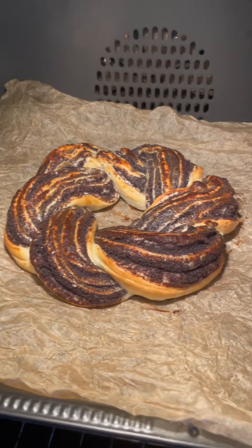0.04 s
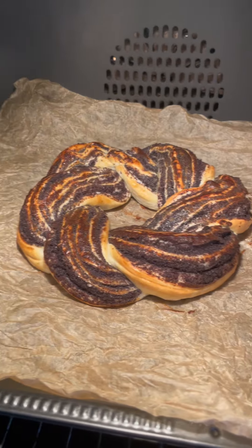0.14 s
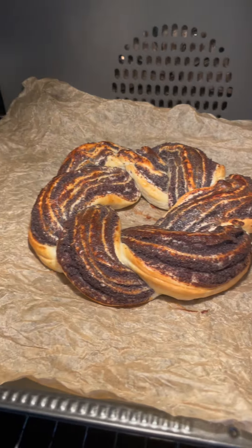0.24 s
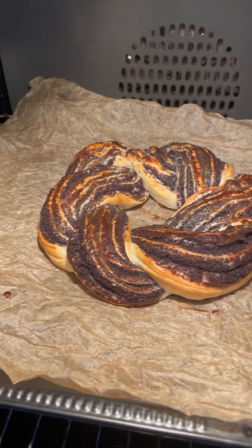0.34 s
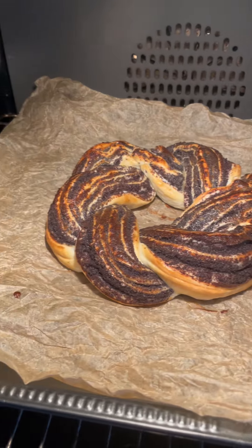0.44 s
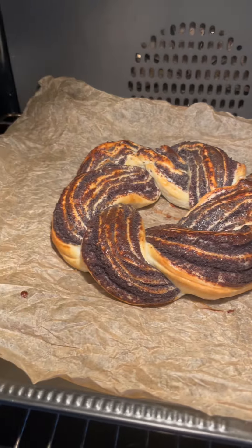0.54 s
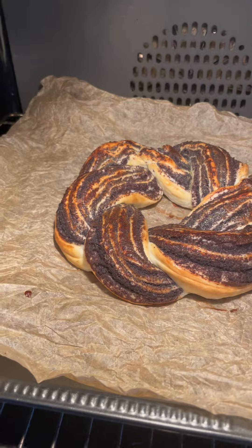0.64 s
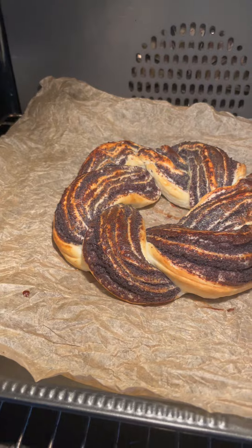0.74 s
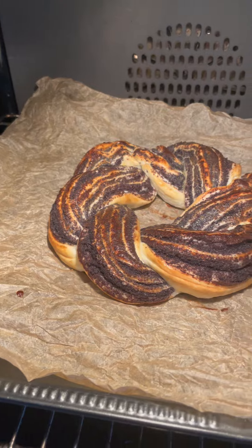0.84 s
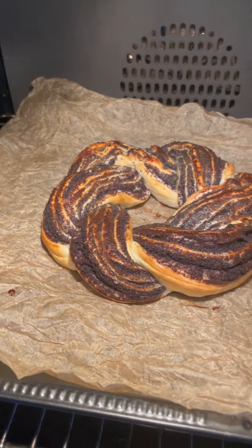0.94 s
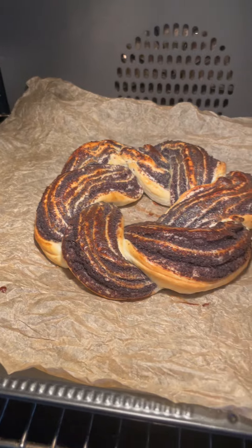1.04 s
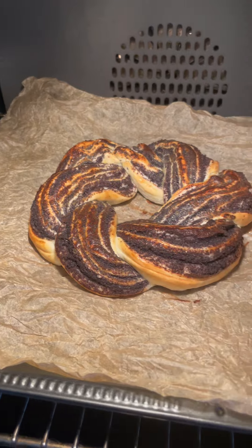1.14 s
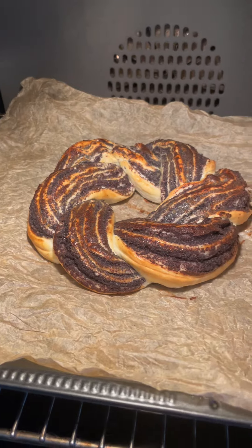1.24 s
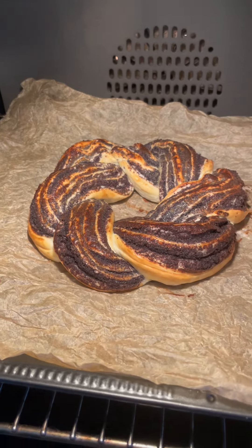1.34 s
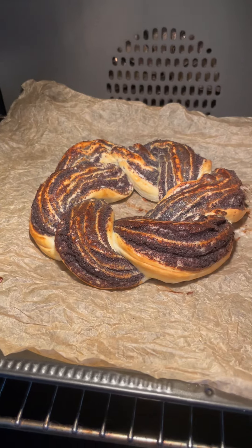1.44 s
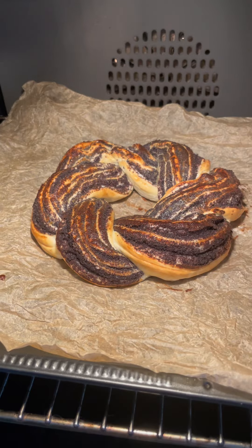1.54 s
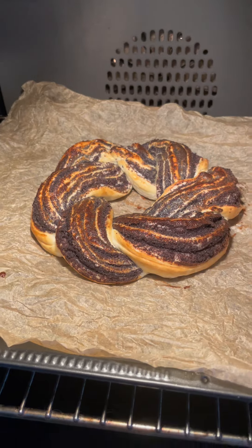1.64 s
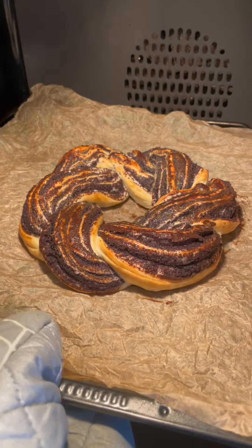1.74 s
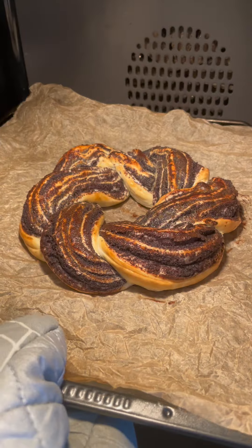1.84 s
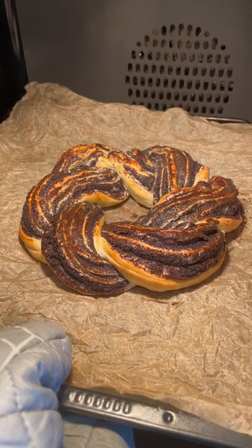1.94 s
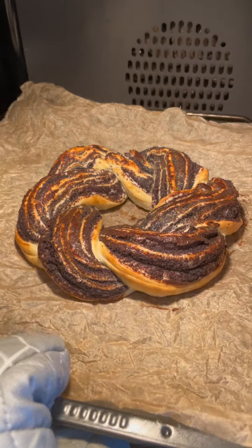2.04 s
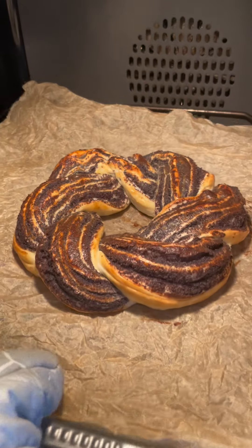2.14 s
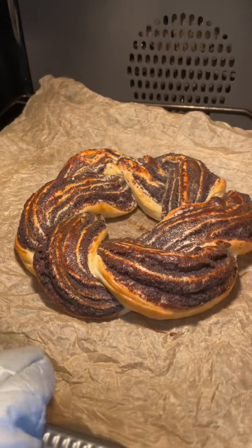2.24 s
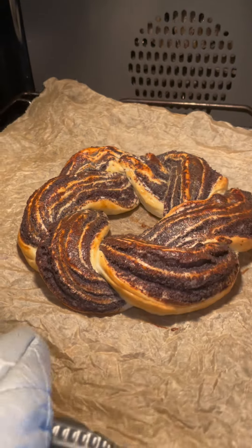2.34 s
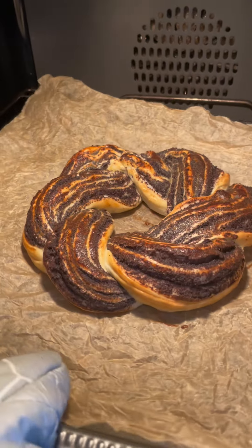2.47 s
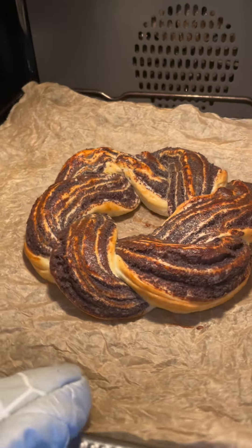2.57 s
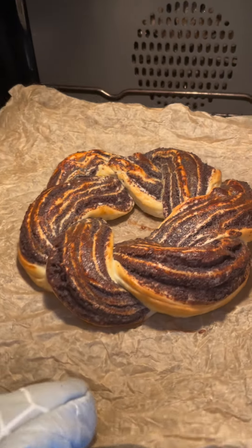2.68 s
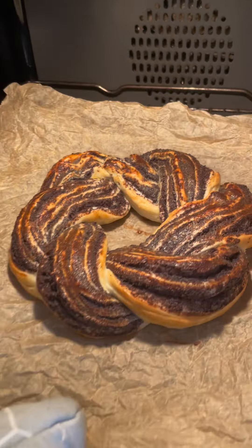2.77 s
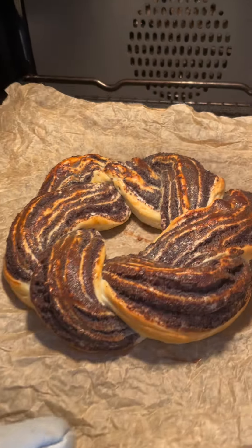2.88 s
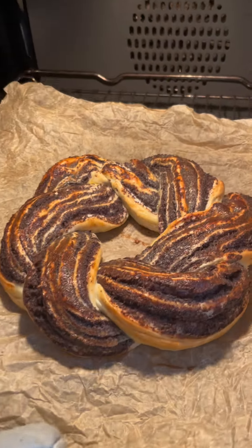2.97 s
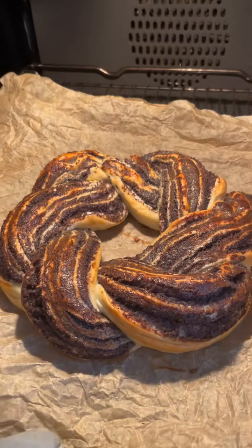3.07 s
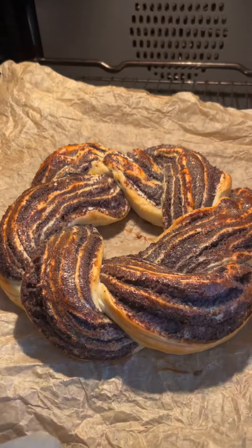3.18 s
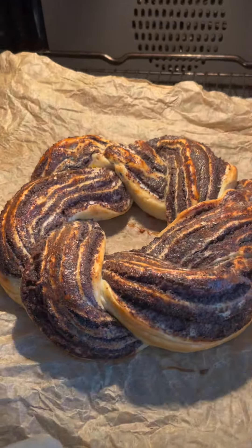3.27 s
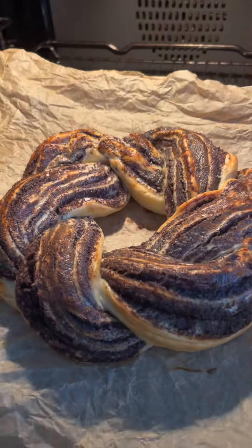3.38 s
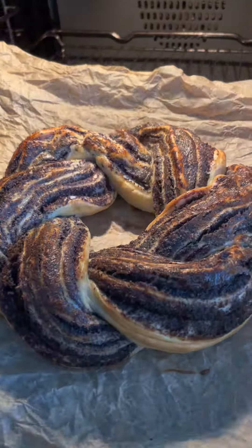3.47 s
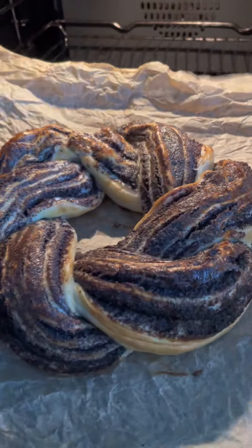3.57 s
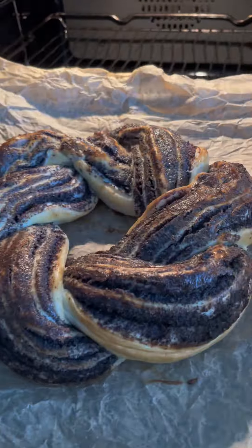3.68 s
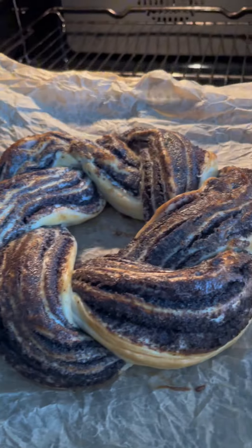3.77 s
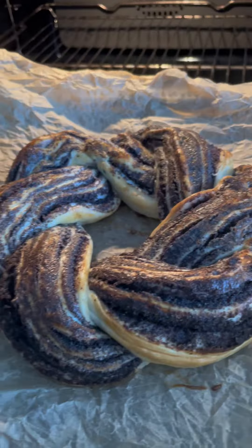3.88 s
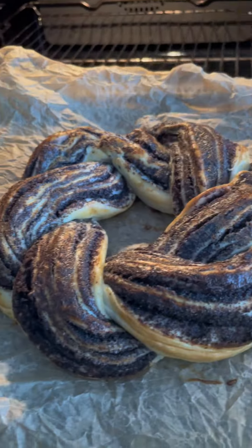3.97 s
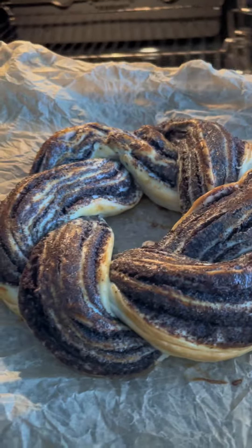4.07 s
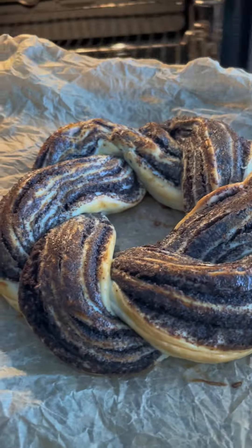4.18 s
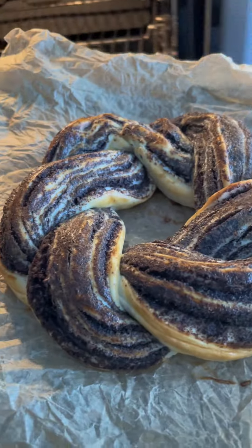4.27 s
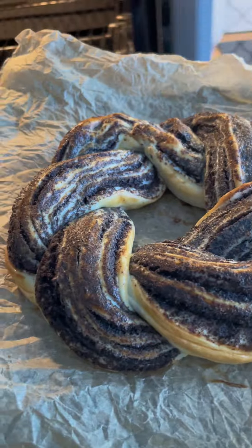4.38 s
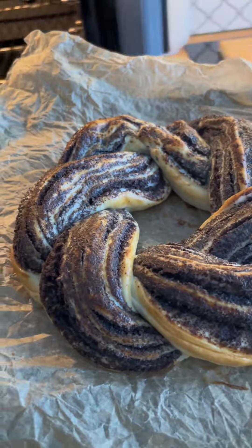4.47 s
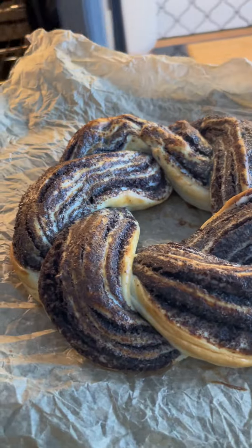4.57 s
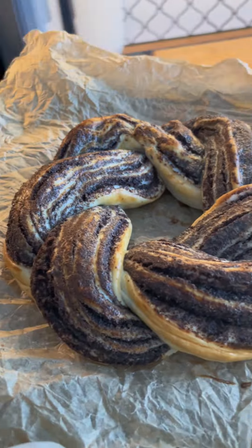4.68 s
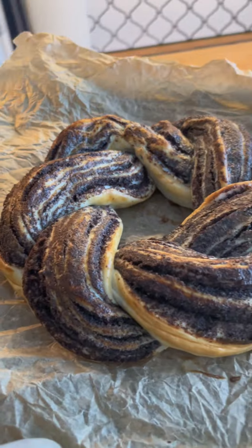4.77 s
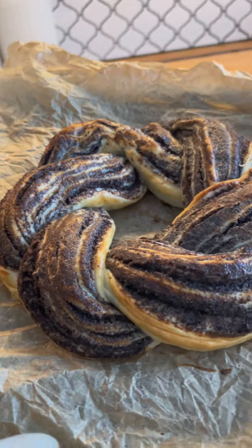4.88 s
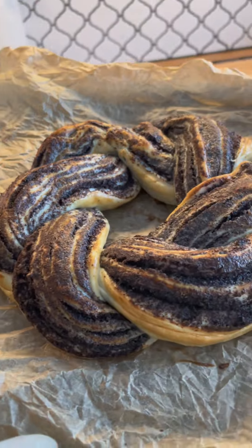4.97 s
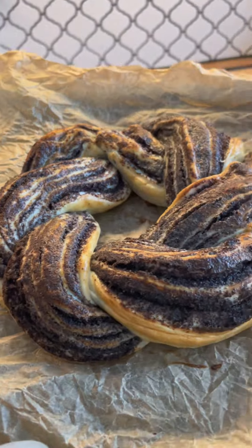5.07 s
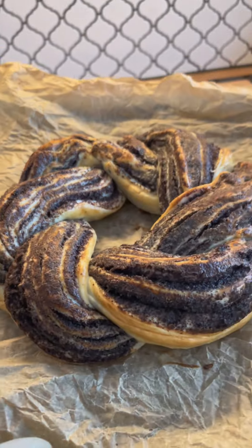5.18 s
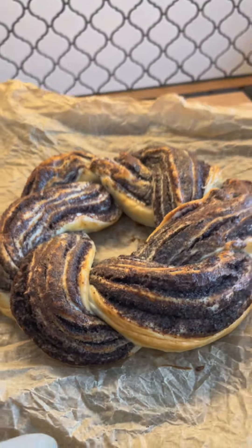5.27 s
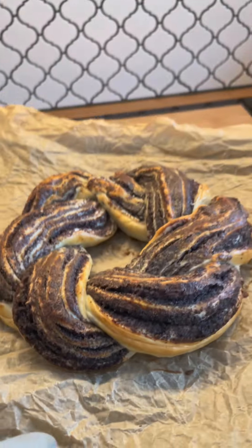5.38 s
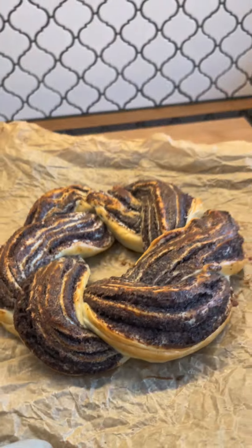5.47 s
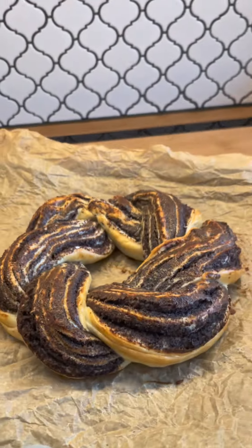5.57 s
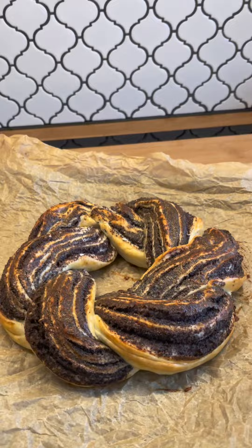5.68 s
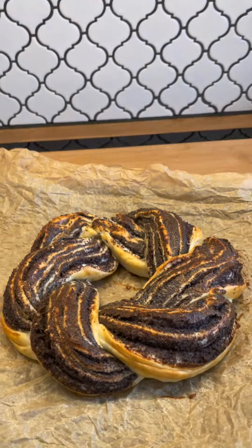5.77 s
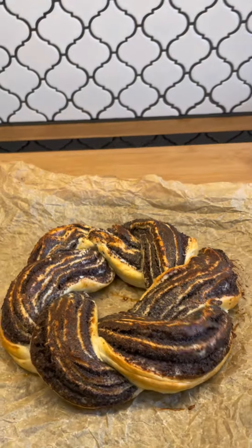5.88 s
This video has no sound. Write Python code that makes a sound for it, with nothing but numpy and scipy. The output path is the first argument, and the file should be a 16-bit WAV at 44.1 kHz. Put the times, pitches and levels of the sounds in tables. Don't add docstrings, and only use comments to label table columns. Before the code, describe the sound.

Close phone capture in a kitchen: soft oven fan alone at first, with tiny ticks. Abruptly a baking tray rattles and scrapes in uneven jerks across rack wires, loud metallic clacks over deep wobbling sheet booms and crackly paper. The fan recedes as the tray is carried, with a bright clink and small taps, then the corner lands with a short bouncing knock on a wooden top.

```python
import sys
import numpy as np
from scipy import signal
from scipy.fft import rfft, irfft, next_fast_len
from scipy.io import wavfile
from scipy.ndimage import uniform_filter1d, map_coordinates

SR = 44100
rng = np.random.default_rng(int(sys.argv[2]) if len(sys.argv) > 2 else 0)


def how_loud(loudness_db):
    steps = np.asarray(loudness_db, float) / 20
    return 10 ** steps


def digitize_waveform(pressure):
    field = np.atleast_2d(pressure).T
    bounded = np.clip(field, -1, 1)
    quanta = np.round(bounded * 32767).astype(np.int16)
    wavfile.write(sys.argv[1], SR, quanta)


N = 261072


def unit(x):
    return x / np.sqrt(np.mean(x ** 2) + 1e-20)


def along(points, hz):
    f, v = np.transpose(points)
    return np.interp(np.log(hz + 1), np.log(f + 1), v)


def curves(rows):
    times, *columns = np.transpose(rows)
    return [np.interp(np.arange(N) / SR, times, column) for column in columns]


def wobble(rate):
    coarse = np.arange(0, N + 32, 32)
    knots = rng.standard_normal(int(N * rate / SR) + 4)
    return np.interp(np.arange(N), coarse, map_coordinates(knots, [coarse * rate / SR]))


def filtered(x, response):
    m = next_fast_len(x.shape[-1] + 2048)
    spectrum = rfft(x, m) * response(np.fft.rfftfreq(m, 1 / SR))
    return irfft(spectrum, m)[..., :x.shape[-1]]


def resonances(f, modes):
    total = 0
    for k, (centre, width, db) in enumerate(modes):
        damping = 1j * f * width
        total = total + (-1) ** k * how_loud(db) * damping / (centre * centre - f * f + damping)
    return total


def add_at(out, s, sound):
    out[round(s * SR):][:len(sound)] += sound


def grit(per_s, spread_db, smooth):
    size = how_loud(spread_db * np.minimum(rng.exponential(size=N), 2.5))
    slips = (rng.random(N) < per_s / SR) * rng.standard_normal(N) * size
    return unit(slips) + smooth * rng.standard_normal(N)


def patchy(x, depth_db):
    z = signal.stft(x, nperseg=256)[2]
    field = uniform_filter1d(rng.standard_normal(z.shape), size=5, axis=0)
    field = uniform_filter1d(field, size=9, axis=1)
    return unit(signal.istft(z * how_loud(depth_db * unit(field)), nperseg=256)[1][:N])


# (start [s], length [s], load [dB], speed [dB], trend over the pull [dB])
STROKES = [(1.73, 0.19, -58, -63, 9), (1.933, 0.1, -47.5, -52.5, 1.5), (2.05, 0.17, -37.5, -54.5, 2.5),
           (2.213, 0.088, -43, -36.5, -1.5), (2.303, 0.28, -46.5, -44, -1), (2.6, 0.51, -47, -54, -5.5),
           (2.85, .2, -35, -50.5, -1.5), (3.056, 0.12, -35.5, -42.5, -2.5), (3.212, 0.13, -45.5, -50.5, 4),
           (3.361, 0.069, -43.5, -36.5, -3), (3.413, 0.07, -26.5, -31.5, -7.5),
           (3.487, 0.12, -38.5, -34.5, -5), (3.621, 0.24, -51.5, -52.5, -13),
           (3.826, 0.092, -54, -49.5, -5.5), (3.933, 0.28, -57.5, -67.5, -13), (4.515, .28, -63, -73, 3),
           (4.89, 0.17, -61, -59.5, -17), (5.043, 0.066, -56, -68, -12), (5.256, 0.24, -56, -64, -7.5),
           (5.417, 0.14, -63.5, -56.5, 2.5), (5.558, 0.084, -73, -51, -5), (5.68, 0.22, -66, -64.5, -5)]
GRIP_S, LET_GO_S = 0.0079, 0.15


def strokes():
    load, speed, t = np.zeros(N), np.zeros(N), np.arange(N) / SR
    for s, length, load_db, speed_db, trend_db in STROKES:
        start = int(s * SR)
        u = t[start:] - s
        drift_db = trend_db * np.minimum(u / length, 1)
        fade_db = 60 * np.maximum(u - length, 0) / LET_GO_S
        shape = (1 - np.exp(-u / GRIP_S)) * how_loud(drift_db - fade_db)
        load[start:] += (how_loud(load_db) * shape) ** 2
        speed[start:] += (how_loud(speed_db) * shape) ** 2
    return np.sqrt(load), np.sqrt(speed)


# (start [s], length [s], level [dB])
RUBS = [(0.34, .03, -70), (0.586, .02, -68), (0.668, .03, -70), (2.72, .03, -50), (2.81, .04, -48),
        (3.70, .03, -55), (3.755, .06, -58), (3.866, .025, -53), (5.69, .02, -62), (5.715, .05, -59),
        (5.775, .07, -67)]
RUB_FADE_S = 0.05


def rubs():
    t, gain = np.arange(N) / SR, np.zeros(N)
    for s, length, db in RUBS:
        fade_db = np.minimum(60 * np.maximum(t - s - length, 0) / RUB_FADE_S, 99)
        gain += (t > s) * how_loud(db - fade_db)
    return gain


# (time [s], level [dB], pitch [Hz], t60 [s])
FLEXES = [(1.74, -70, 84.9, 0.53), (1.982, -37, 87.3, 1.2), (2.103, -28.5, 150, 1),
          (2.189, -24.5, 164.2, 0.54), (2.227, -23, 117.8, 0.19), (2.31, -35.5, 131.7, 1.8),
          (2.45, -35.5, 89.4, 1.2), (2.56, -38, 84.7, 0.51), (2.621, -36, 83.7, 0.83),
          (2.671, -32, 76, 0.32), (2.872, -33, 161.3, 1.4), (2.931, -32.5, 108.3, 1.3),
          (3.02, -36.5, 142.9, 1.2), (3.105, -33, 111, 1), (3.331, -35.5, 98.5, 0.19),
          (3.441, -35.5, 58, 0.24), (3.58, -36, 57.9, 0.56), (3.72, -56, 99.8, 0.49),
          (4.699, -47, 111.3, 0.46), (5.07, -57.5, 110.2, .4), (5.268, -56, 110, 0.42),
          (5.43, -60, 110, 0.29), (5.86, -60, 109, 0.42)]
SWELL_DB_PER_S, LONGEST_T60_S = 214, 1.2


def flexes():
    t = np.arange(0, N + 64, 64) / SR
    levels = []
    for s, db, _, t60 in FLEXES:
        fade_db = 60 * (t - s) / min(t60, LONGEST_T60_S)
        levels.append(db - np.where(t < s, SWELL_DB_PER_S * (s - t), fade_db))
    loudest = np.max(levels, axis=0)
    return how_loud(np.interp(np.arange(N) / SR, t, loudest)), curves(FLEXES)[1]


# (frequency [Hz], width [Hz], level [dB])
SHEET = [(890, 35, 1.5), (1278, 76, 5), (1470, 25, 5), (1698, 20, 10.5), (1952, 80, 3), (2202, 78, 9.5),
         (2450, 62, 3.5), (2800, 83, 10), (3200, 36, 4), (3570, 93, 10.5), (4085, 48, 3), (5600, 51, 6.5),
         (5857, 55, 1), (7030, 70, 2.5)]
# (frequency [Hz], width [Hz], level [dB])
RACK = [(293, 47, -5), (413, 24, 10), (476, 18, 4), (573, 40, 5), (890, 6.5, -1.5)]
# (frequency [Hz], width [Hz], level [dB])
BOOM = [(79, 96, -3), (150, 132, -0.15)]
# (frequency [Hz], level per Hz [dB])
RATTLE = [(120, -5.5), (280, 2.5), (600, -0.5), (1200, -0.5), (2200, -64.5)]
# (frequency [Hz], level per Hz [dB])
SLIP = [(600, -35), (1300, 0), (2200, 2.5), (3600, -1), (5500, -32.5), (12000, -2)]
# (frequency [Hz], level per Hz [dB])
RASP = [(2200, -12), (4200, -7), (8000, -5.5), (11000, 7), (14000, -12.5), (16000, -19.5)]
EDGE_LOAD_DB, EDGE_SPEED_DB = -4.5, 5
WOOD_S, WOOD_DB = 5.9, 14
CATCH_DB = 1.2


def drag():
    load, speed = strokes()
    on_wood = np.arange(N) > WOOD_S * SR
    edge = np.hypot(how_loud(EDGE_LOAD_DB) * load, how_loud(EDGE_SPEED_DB) * speed) * how_loud(WOOD_DB * on_wood)
    edge = edge + rubs()
    bend, flex_hz = flexes()
    judder = wobble(45)

    def body(shape):
        return lambda f: how_loud(along(shape, f)) * (0.5 + resonances(f, SHEET) * how_loud(-5.5))

    def wires(f):
        return how_loud(along(RATTLE, f)) * (0.59 + resonances(f, RACK))

    phase = 2 * np.pi * np.cumsum(flex_hz * (1 + 0.0736 * wobble(30))) / SR
    flex = np.sin(phase) * how_loud(0.84 * wobble(25))
    shake = unit(filtered(rng.standard_normal(N), lambda f: resonances(f, BOOM) ** 2))
    boom = bend * (0.7 * flex + 0.62 * shake)

    rattle = patchy(filtered(grit(900, 2.4, smooth=1.8), wires), depth_db=1.5)
    rattle = rattle * load * how_loud(0.53 * judder)

    flutter_db = 1.0 * judder + 1.5 * wobble(120)
    slip = patchy(filtered(grit(900, 2.8, smooth=0.9), body(SLIP)), depth_db=1.4)
    slip = slip * edge * how_loud(flutter_db)

    rasp_db = 10.5 + CATCH_DB * judder + 1.7 * wobble(76)
    rasp = patchy(filtered(grit(1500, 1.4, smooth=1.0), body(RASP)), depth_db=1.5)
    rasp = rasp * speed * how_loud(rasp_db)
    return boom + rattle + slip + rasp


# (frequency [Hz], width [Hz], level [dB]); a clack uses only the frequencies
TRAY = [(389.5, 7.4, -1.5), (1247, 51, -6.5), (1960, 320, -15), (2890, 63, 7.5), (3800, 49, -18),
        (3970, 41, 2.5), (5500, 160, -31), (6760, 490, -16), (7870, 50, -32.5)]
FIRST_TOUCH, TOUCH_S = 1.75, 0.00034


def clack(hz, thud_db, snap_db, linger_db):
    t = np.arange(SR // 10) / SR
    slow = how_loud(min(linger_db, 5))

    def fade(t60):
        return how_loud(-60 * t / (t60 * slow)) * (1 - np.exp(-t / (0.00065 * slow)))

    def burst(t60):
        touches = rng.standard_normal(len(t)) * how_loud(2.78 * rng.standard_normal(len(t)))
        first = FIRST_TOUCH / max(slow, 1) ** 2 * np.exp(-t / TOUCH_S)
        return touches * (fade(t60) + 0.15 * fade(3.14 * t60) + first)

    def top(v):
        return v / np.abs(v).max()

    modes = [(hz, 0.11 * hz, 1.5), (hz, 0.92 * hz, -8)]
    for centre, _, _ in TRAY:
        modes.append((centre, 70 + 0.02 * centre, -5 - 14 * abs(np.log(centre / hz))))

    def dull(f):
        return resonances(f, [(932, 1950, 0.0091)]) ** 2 + resonances(f, [(241, 170, 0.5)])

    ring = filtered(burst(0.041), lambda f: resonances(f, modes))
    thud = filtered(burst(0.12), dull)
    snap = filtered(burst(0.031), lambda f: resonances(f, [(11720, 9150, 0)]) ** 2)
    return top(ring) + how_loud(thud_db + 5.0) * top(thud) + how_loud(snap_db + 10.0) * top(snap)


# (time [s], peak [dB], centre [Hz], snap [dB])
CLICKS = [(1.7513, -41, 2370, -7), (1.7747, -10, 6300, -12), (1.8085, -13.5, 5500, -20),
          (1.8165, -13.5, 3740, -8), (1.8855, -19, 3440, 6), (1.9335, -29, 3700, -18.5),
          (2.2304, -30.5, 4100, 15), (2.2905, -21, 3900, 4), (2.3548, -8.5, 3800, -3.5),
          (2.3956, -21, 2770, 6), (2.4425, -10.5, 2920, -6.5), (2.6721, -29, 2400, -32),
          (3.2321, -24, 3280, -2), (3.2775, -5, 4270, -4), (3.2779, -18.5, 4650, 14),
          (3.3546, -17, 6270, -1), (3.3864, -15, 7600, -1.5), (3.5967, -15, 6400, -4),
          (3.695, -38, 3800, -15.5), (3.7078, -28, 5000, -12), (5.5257, -21, 5690, -10.5),
          (1.7755, -30, 2640, -25), (5.5801, -21, 6400, 11), (5.615, -32, 5170, 6),
          (1.9851, -29, 2100, -10), (2.0754, -38.5, 2800, 10), (2.0834, -28, 1990, -18),
          (2.2101, -22, 2080, -8), (2.4755, -23, 1960, -2), (2.497, -45, 2800, -2), (2.5808, -33, 5500, 7),
          (2.6237, -37, 5500, 8), (2.6521, -32, 2140, -16), (2.7968, -51, 5500, 12),
          (2.8143, -26.5, 1410, -24), (2.8861, -35, 1345, 3), (2.9405, -36, 2700, 9),
          (2.9789, -34, 2750, 9), (3.0682, -25, 1680, -12), (3.1111, -40, 5810, 5), (3.2138, -35, 6120, 6),
          (3.3296, -31, 2450, 4), (3.361, -18, 7040, -1.5), (3.3725, -27, 2150, 11.5),
          (3.4932, -27, 2190, 7.5), (3.5107, -14.5, 7030, -3.5), (3.5496, -28, 2370, 3),
          (5.5262, -27, 3850, -17), (5.5812, -24, 2880, -9)]
# (time [s], peak [dB], centre [Hz], snap [dB])
RAPS = [(1.7278, -42.5, 2670, -8), (1.8113, -18.5, 4070, 4), (1.882, -19, 4640, 9.5),
        (2.0282, -26.5, 2500, -30), (2.2054, -17, 2090, -20), (2.3333, -18, 2970, 5),
        (2.6837, -21, 2565, -10), (3.1104, -29.5, 1900, 8), (3.1556, -18.5, 5900, 3),
        (3.419, -17.5, 2220, 6.5), (3.4479, -22.5, 3700, 9), (3.5552, -10, 2256, -2),
        (3.6319, -25.5, 4950, 3), (3.834, -34.5, 7330, -14), (3.8654, -33, 2330, 1),
        (3.876, -33.5, 3000, 5), (3.9054, -49.5, 2250, 17), (4.6408, -47, 2115, -21),
        (5.4443, -37.5, 1597, 5), (5.4695, -33, 1980, -2)]
# (time [s], peak [dB], centre [Hz], snap [dB])
BUMPS = [(2.0601, -25, 1960, -22), (2.1164, -21, 2460, -18), (2.1214, -31, 2830, -9),
         (2.1788, -27, 2700, -25), (2.5554, -37.5, 2365, 10.5), (2.7975, -36.5, 2410, 3),
         (2.8321, -28.5, 1960, 6.5), (2.8583, -23.5, 2290, -33.5), (3.0294, -34.5, 2400, -11),
         (5.2658, -39, 1540, -27), (5.5454, -40.5, 1470, -6), (5.8800, -31, 1580, -28.5)]
# (time [s], peak [dB], centre [Hz], thud [dB])
PINGS = [(3.7519, -19, 8560, -26), (4.903, -17, 5400, -39), (4.9036, -27.5, 1360, -29.5),
         (5.5803, -26, 7470, -10), (5.8765, -26, 1800, -3), (2.1950, -14, 1960, -8.5),
         (2.8589, -28, 1290, 2.5), (4.8890, -60, 5070, -30), (4.8948, -41.5, 5100, -12),
         (5.8610, -44, 1260, -16)]
# (time [s], peak [dB])
TICKS = [(0.119, -46), (0.35, -53), (0.508, -48), (0.592, -54), (0.619, -50), (0.821, -55), (1.03, -50),
         (1.232, -50.5), (1.615, -55), (4.2623, -52.5), (4.374, -52), (4.433, -57), (4.4645, -52),
         (4.476, -60), (4.493, -58), (4.599, -52), (5.049, -56.5), (5.199, -53.5)]
# (frequency [Hz], level [dB], t60 [s])
CLINK = (4.9028, [(5080, -43, .13), (5230, -37, .05), (5350, -39, .12), (5480, -40, .05)])
CLICK, RAP, BUMP = (-29, -1.36), (-12, 0.83), (0.45, 5.5)
PING_SNAP_DB, PING_LINGER_DB = 2.2, -9
SNAP_DB_PER_OCTAVE = 21


def contacts():
    out = np.zeros(N + SR)
    for rows, (thud_db, linger_db) in [(CLICKS, CLICK), (RAPS, RAP), (BUMPS, BUMP)]:
        for s, db, hz, snap_db in rows:
            add_at(out, s, how_loud(db - 3.5) * clack(hz, thud_db, snap_db, linger_db))
    for s, db, hz, thud_db in PINGS:
        snap_db = PING_SNAP_DB + SNAP_DB_PER_OCTAVE * np.log2(hz / 6000)
        add_at(out, s, how_loud(db) * clack(hz, thud_db, snap_db, PING_LINGER_DB))
    for s, db in TICKS:
        add_at(out, s, how_loud(db - 2.5) * clack(7400, -9, 3, -14))
    t = np.arange(SR // 10) / SR
    clink_s, clink_modes = CLINK
    for hz, db, t60 in clink_modes:
        add_at(out, clink_s, how_loud(db - 60 * t / t60) * np.sin(2 * np.pi * hz * t))
    return out[:N]


# (time [s], level [dB])
LANDING = [
    (5.8845, -5),
    (5.8874, -10),
    (5.8906, -8.5),
]
# (frequency [Hz], level [dB], t60 [s])
CORNER = [(305, -12.5, 0.027), (385, -13, 0.045), (577, -11.5, 0.037), (763, -17, .05), (1000, -3.5, 0.034),
          (1150, -4, 0.035), (1302, -0.5, 0.045), (1580, -1, 0.026), (2218, -10.5, 0.06),
          (2330, -9.5, 0.048), (2660, -11, 0.037), (3600, -21.5, 0.032), (5685, -11, 0.033),
          (6900, -22, .03)]
WOOD_DAMPS = 0.75


def landing():
    out, t = np.zeros(N + SR), np.arange(SR // 10) / SR
    for s, db in LANDING:
        ring = np.zeros(len(t))
        for hz, level_db, t60 in CORNER:
            decay_db = level_db + rng.normal(0, 1.66) - 60 * t / (WOOD_DAMPS * t60)
            ring += how_loud(decay_db) * np.sin(2 * np.pi * hz * t)
        ring = ring * (1 - np.exp(-t / 0.00078))
        add_at(out, s, how_loud(db) * (ring + how_loud(-8.5) * clack(2400, -4.5, -5.0, 0.53)))
    return out[:N]


# (time [s], level [dB], frequency [Hz], t60 [s])
RINGS = [(1.7745, -30, 3430, .03), (1.8112, -21, 6029, .03), (1.8112, -20, 3600, .035),
         (1.8168, -19, 3590, .035), (1.8825, -25, 6287, .03), (1.883, -31, 1960, 0.035),
         (1.885, -30, 7300, .03), (2.124, -32, 2770, .04), (2.229, -29, 4200, .04), (2.231, -34, 6115, .04),
         (2.355, -27, 2060, 0.041), (2.396, -35, 6976, .03), (2.442, -32, 5943, .03),
         (2.671, -41, 2490, 0.073), (2.729, -35, 1346, 0.092), (2.859, -25, 1981, .04),
         (2.938, -30, 429, 0.11), (3.157, -34, 7200, .04), (3.2775, -23, 7100, .03),
         (3.278, -28, 6373, .03), (3.282, -30, 1714, .035), (3.385, -33, 6330, .03),
         (3.4185, -22, 2170, .04), (3.419, -27, 3380, .04), (3.449, -28, 3703, .04),
         (3.508, -32, 2153, .05), (3.509, -32, 3875, .05), (3.518, -31, 5857, .04), (3.555, -33, 5700, .04),
         (3.5565, -23, 2245, 0.049), (3.565, -29.5, 3875, 0.046), (3.6955, -40, 3750, 0.023),
         (3.7078, -36, 3780, .03), (3.751, -28, 6680, .02), (3.7515, -29, 3800, .02),
         (3.752, -35, 5300, 0.036), (3.7525, -31, 2290, .025), (3.833, -46, 1510, 0.037),
         (3.841, -46, 7321, .08), (3.868, -38, 2250, .16), (3.862, -44, 3200, .1),
         (4.9032, -31.5, 1098, 0.031), (4.9035, -31.5, 1517, 0.044), (4.9035, -37, 3800, .02),
         (4.905, -41, 2890, .05), (4.906, -41, 220, 0.052), (5.5805, -35, 1880, .03),
         (5.858, -52, 1260, .2), (5.886, -22, 5857, 0.044), (5.887, -28, 104, .15),
         (5.8955, -18, 1000, .04), (5.896, -22, 2300, .04), (5.8875, -17, 280, .03),
          (5.912, -26, 500, .06), (5.915, -26, 2300, .05), (1.8095, -28, 2700, .03),
          (1.8115, -26, 2300, .03), (1.889, -30, 3500, .05), (2.684, -27, 2500, .02),
          (3.157, -28, 3000, .03), (2.2, -26, 1500, .05), (2.865, -27, 2600, .04), (3.362, -32, 3200, .02),
          (3.612, -36, 3700, .02), (4.9032, -28, 5300, .015)]
RISE_SHARE, RING_ROUGH = 0.03, 0.28


def rings():
    out, t = np.zeros(N + SR), np.arange(SR // 6) / SR
    for s, db, hz, t60 in RINGS:
        wander = RING_ROUGH * np.cumsum(rng.standard_normal(len(t))) * np.sqrt(hz / SR)
        swell = 1 - np.exp(-t / (RISE_SHARE * t60))
        add_at(out, s, how_loud(db - 60 * t / t60) * swell * np.sin(2 * np.pi * hz * t + wander))
    return out[:N]


# (time [s], level [dB])
FAN = [(0, 0), (1.6, 1.5), (3.7, -3), (4.3, -7.5), (4.75, -7), (5.2, -11), (5.92, -10)]
# (frequency [Hz], level per Hz [dB])
RUMBLE = [(25, -24.5), (50, 1), (120, -1), (200, -9), (290, -9.5), (340, -14.5), (600, -25.5), (900, -44.5)]
# (frequency [Hz], level per Hz [dB])
HISS = [(150, -33), (400, -12), (750, 2.5), (900, -3.5), (2500, -9), (5000, -14), (10000, -13.5),
        (15000, -5.5), (16200, -26)]
# (frequency [Hz], width [Hz], level [dB])
WHINE = [(242, 12, 1), (671, 16, -3), (747, 20, -2)]
RUMBLE_DB, HISS_DB, TONE_DB = -53.5, -61.5, -65.5
HISS_FOLLOWS, TONE_FOLLOWS = 0.29, 0.27
TONE_HZ = 821
TONE_LEAVES_S, TONE_LEAVES_DB = 5.44, -6


def fan():
    near_db, = curves(FAN)
    hiss_db = HISS_DB + HISS_FOLLOWS * near_db

    def noise(shape):
        return unit(filtered(rng.standard_normal(N), shape))

    rumble = how_loud(RUMBLE_DB + near_db + 0.39 * wobble(3.2)) * noise(lambda f: how_loud(along(RUMBLE, f)))
    hiss = how_loud(hiss_db + 0.5 * wobble(12)) * noise(lambda f: how_loud(along(HISS, f)))
    whine = how_loud(hiss_db - 5.5) * noise(lambda f: resonances(f, WHINE) ** 2)
    shaded = np.clip((np.arange(N) / SR - TONE_LEAVES_S) / 0.2, 0, 1)
    tone_db = TONE_DB + TONE_FOLLOWS * near_db + TONE_LEAVES_DB * shaded
    phase = 2 * np.pi * np.cumsum(TONE_HZ + 1.1 * wobble(5.4)) / SR
    tone = how_loud(tone_db + 2.5 + 0.7 * wobble(3.1)) * np.sin(phase)
    return rumble + hiss + whine + tone


# (frequency [Hz], t60 [s])
KITCHEN = [(200, 0.98), (2000, 0.095), (8000, 0.25), (16000, 0.06)]


def tail(seconds, scale):
    hz, t, z = signal.stft(rng.standard_normal(int(seconds * SR)), SR, nperseg=256)
    t60 = scale * along(KITCHEN, hz)[:, None]
    h = signal.istft(z * how_loud(-60 * t / t60), SR, nperseg=256)[1]
    return h / np.linalg.norm(h)


def scattered(x):
    z = signal.stft(x, nperseg=128)[2]
    return signal.istft(z * np.exp(2j * np.pi * rng.random(z.shape)), nperseg=128)[1][:N]


def scene():
    hits = contacts() + landing()
    tray, air = drag() + hits, fan()
    turns = np.arange(N) // (SR // 4) % 3 == np.arange(3)[:, None]
    echo = sum(signal.fftconvolve(part, tail(0.066, 0.97))[:N] for part in hits * turns)
    tray = tray + rings()
    near = tray + air + how_loud(-16.5) * echo
    apart = scattered(tray + how_loud(7.0) * air + how_loud(-2.0) * echo)
    return np.array([near + apart, near - apart])


def thinned(mid, side, under_db, sudden_db):
    window = ("kaiser", 3)
    z = signal.stft([mid, side], SR, nperseg=2048, window=window)[2]
    power = np.abs(z[:, :1024]).reshape(2, 64, 16, -1) ** 2
    band = power.sum(axis=2)
    treble = band[:, 8:].sum(axis=(0, 1))
    sudden = treble > how_loud(2 * sudden_db) * np.roll(treble, 1)
    weak = (band < how_loud(2 * under_db) * band[::-1]) & ~sudden
    weak[:, :4] = False
    z[:, :1024] *= ~np.repeat(weak, 16, axis=1)
    return signal.istft(z, SR, nperseg=2048, window=window)[1][:, :N]


def top_cut(x):
    return signal.sosfilt(signal.butter(12, 16990, fs=SR, output="sos"), x)


# (frequency [Hz], level [dB])
SUM = [(25, -10), (45, 1), (4600, -1.5), (4880, -4), (5150, 0), (7000, -2.5), (13500, -7.5), (15800, -11)]
# (frequency [Hz], level [dB])
CANCEL = [(7600, 0), (8500, -5), (9200, -19), (11400, -21), (11900, -7), (13300, 0)]
# (frequency [Hz], level [dB])
EDGE = [(15800, -1), (16200, -26.5), (17000, -50.5)]
# (frequency [Hz], level [dB])
DIFFERENCE = [(100, -38), (250, -19.5), (500, -9.5), (900, -5.5), (1800, -13.5), (2700, -6), (4700, -4.5),
              (6000, -10), (7500, -3.5), (11500, -13), (13000, -15), (14000, -13), (15800, -49),
              (16200, -67)]
# (frequency [Hz], angle [rad])
TURN = [(350, 1.8), (650, 1.26), (1400, 0.39), (2300, 1.6), (4500, 1.56), (4900, 6.4), (5400, 2.97),
        (5900, 7.93), (9500, 7.77), (10500, 11.1)]
# (frequency [Hz], angle [rad])
LOOSE = [(100, 3.2), (400, 0.39), (900, 0.47), (1800, 1.1), (4000, 0.32), (7000, 0.23), (12000, 1.1),
         (15000, 3.45)]


def record(dry):
    near, apart = (dry[0] + dry[1]) / 2, (dry[0] - dry[1]) / 2

    def tied(f):
        return how_loud(along(DIFFERENCE, f)) * np.cos(along(LOOSE, f)) * np.exp(1j * along(TURN, f))

    def loose(f):
        return how_loud(along(DIFFERENCE, f)) * np.sin(along(LOOSE, f))

    mid = filtered(near, lambda f: how_loud(along(SUM, f) + along(CANCEL, f) + along(EDGE, f)))
    side = filtered(near, tied) + filtered(apart, loose)
    mid, side = thinned(mid, side, under_db=-11, sudden_db=3.5)
    pair = np.array([mid + side, mid - side])
    pair = pair / (1 + np.abs(pair / 0.95) ** 6) ** (1 / 6)
    return top_cut(pair)


dry = scene()
out = record(dry)
digitize_waveform(out)
```